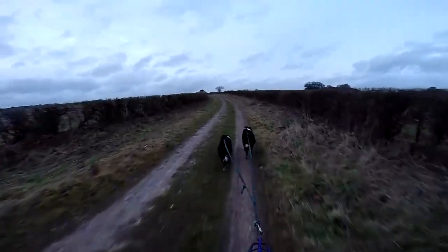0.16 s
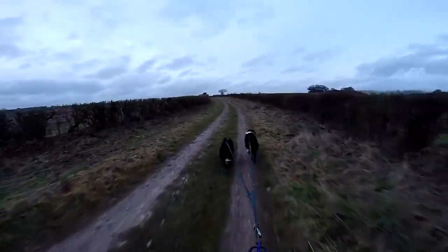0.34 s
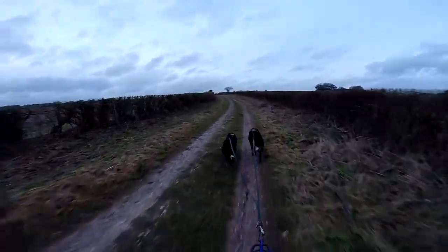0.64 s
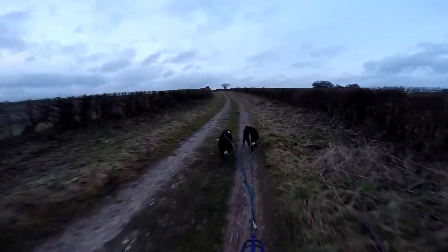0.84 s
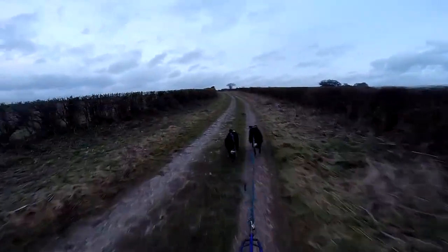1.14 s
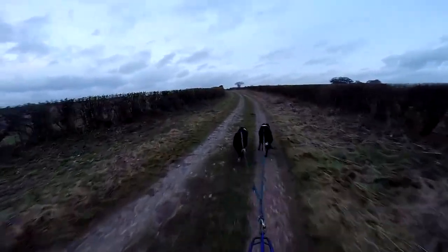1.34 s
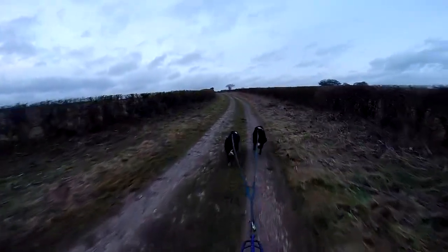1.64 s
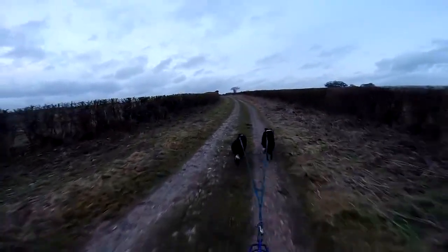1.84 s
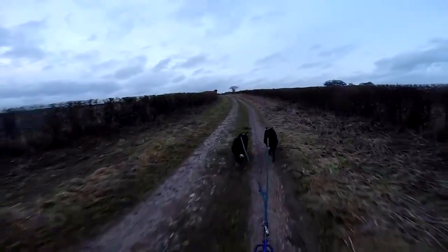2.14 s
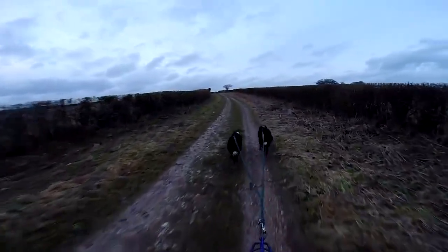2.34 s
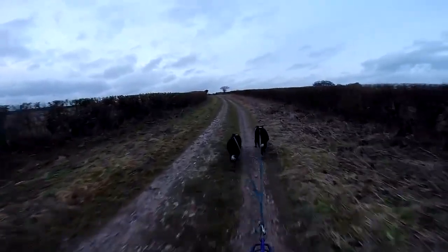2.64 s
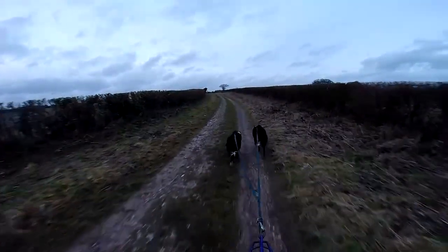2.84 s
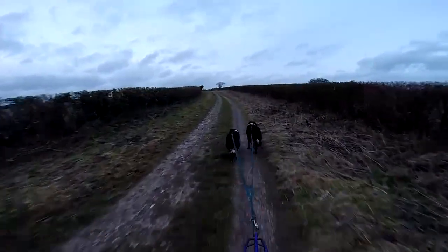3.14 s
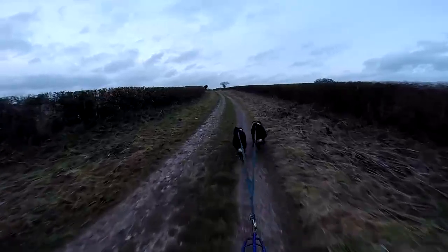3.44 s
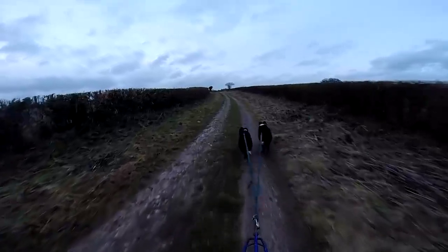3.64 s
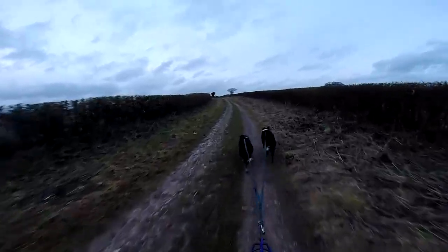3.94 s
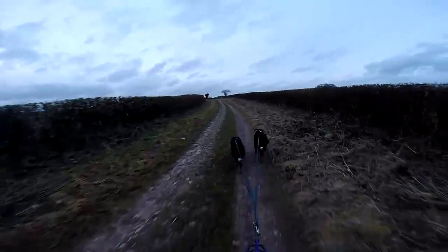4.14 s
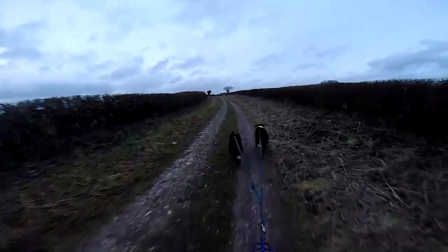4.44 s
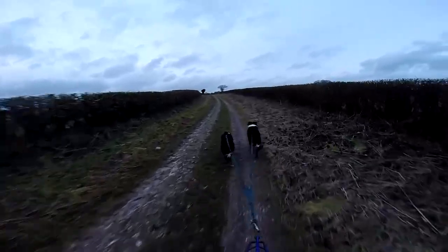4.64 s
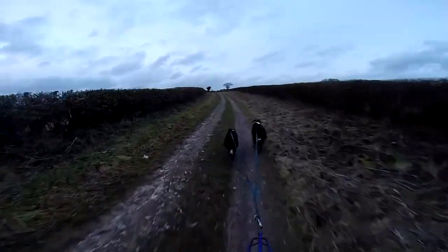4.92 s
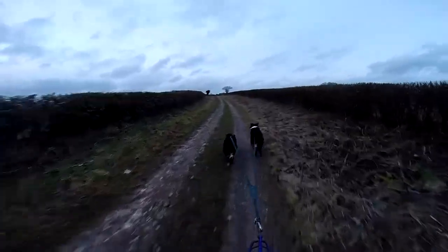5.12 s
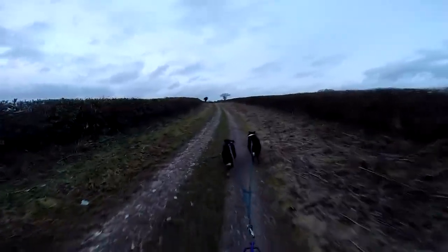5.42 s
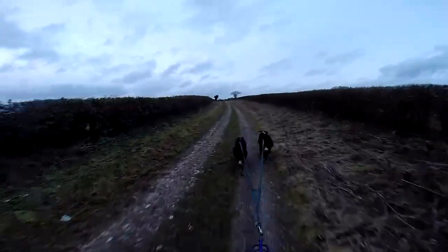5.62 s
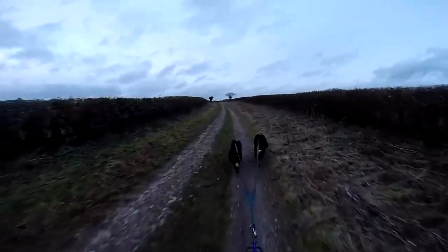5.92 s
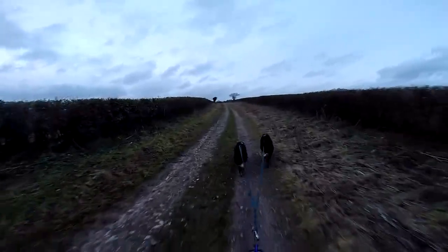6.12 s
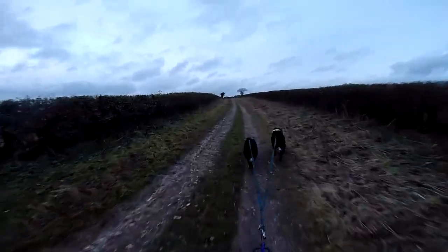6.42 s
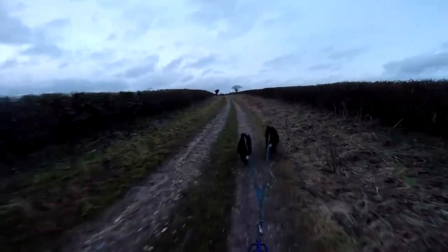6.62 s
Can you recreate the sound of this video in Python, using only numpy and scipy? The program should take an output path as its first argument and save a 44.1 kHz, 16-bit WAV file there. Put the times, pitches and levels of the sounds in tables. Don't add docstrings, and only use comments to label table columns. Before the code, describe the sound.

Muffled, close crackle of grit and pebbles under rolling wheels outdoors, with sharp stone snaps, dull bumps and constant boomy wind and road rumble.

```python
import sys
import numpy as np
from scipy import signal
from scipy.io import wavfile
from scipy.ndimage import uniform_filter1d

SR = 44100
rng = np.random.default_rng(int(sys.argv[2]) if len(sys.argv) > 2 else 0)


def bounce(signal):
    frames = np.transpose(np.atleast_2d(signal))
    limited = np.clip(frames, -1, 1)
    pcm = np.round(limited * 32767).astype(np.int16)
    wavfile.write(sys.argv[1], SR, pcm)


def rack_gain(trim_db):
    fader = np.asarray(trim_db, float)
    return 10 ** (fader / 20)


N = 298557


def rms_one(x):
    return x / np.sqrt(np.mean(x ** 2) + 1e-20)


def curve(rows):
    s, level_db = np.transpose(rows)
    return np.interp(np.arange(N) / SR, s, level_db)


def swells(rows, rest_db):
    edge_db = 11.5
    t = np.arange(0, N, 64) / SR
    power = rack_gain(rest_db) ** 2
    for s, top_db, half_s in rows:
        power = power + rack_gain(top_db - edge_db * np.abs(t - s) / max(half_s, .01)) ** 2
    return np.interp(np.arange(N) / SR, t, 10 * np.log10(power))


def drift(rate):
    r = np.exp(-80 * np.pi * rate / SR)
    slow = signal.lfilter([1], [1, -2 * r, r * r], rng.standard_normal(N // 40 + 2002))[2000:]
    return np.interp(np.arange(N) / 40, np.arange(len(slow)), rms_one(slow))


def resonance(x, hz, width_hz):
    r = np.exp(-np.pi * width_hz / SR)
    zeros = np.array([1, 0, -1]) * (1 - r * r) / 2
    return signal.lfilter(zeros, [1, -2 * r * np.cos(2 * np.pi * hz / SR), r * r], x)


def steep_resonance(x, hz, width_hz, second_width_hz):
    return resonance(resonance(x, hz, width_hz), hz, second_width_hz)


def coloured(spectrum, patchy_db, per_s):
    hz, level_db = np.transpose(spectrum)
    edges = hz[0] * 2 ** np.arange(0, np.log2(hz[-1] / hz[0]) + .4, .5)
    white, out = rng.standard_normal((2, N)), 0
    for k, (low, high) in enumerate(zip(edges, edges[1:])):
        band = signal.sosfilt(signal.butter(2, [low, high], "band", fs=SR, output="sos"), white[k % 2])
        centre_db = np.interp(np.log(low * high) / 2, np.log(hz), level_db)
        out = out + band * rack_gain(centre_db + patchy_db * drift(per_s))
    return rms_one(out)


def through_case(x):
    dull = signal.sosfilt(signal.butter(4, 6400, fs=SR, output="sos"), x)
    dull = dull - .55 * resonance(dull, 3660, 380)
    return dull - .55 * resonance(dull, 5020, 340)


def grains(modes, level_db, per_s, spread_db, clump_db, clumps_per_s, scatter_db):
    busy = rack_gain(.9 * (level_db - np.mean(level_db)))
    chance = per_s * busy * rack_gain(clump_db * drift(clumps_per_s)) / SR
    born = np.flatnonzero(rng.random(N) < chance)
    sizes = (rack_gain(spread_db * np.minimum(rng.exponential(1, N), 4)) / np.sqrt(busy))[born]
    out, luck = np.zeros(N), rng.standard_normal(N + 100)
    for k, (hz, width_hz, mode_db) in enumerate(modes):
        clicks = np.full(N, 1e-18)
        clicks[born] = sizes * rack_gain(scatter_db * luck[born + k]) * np.sign(luck[born + k + 50])
        out += rack_gain(mode_db) * steep_resonance(clicks, hz, width_hz, 2.5 * width_hz)
    return rack_gain(level_db) * rms_one(through_case(out))


def add(track, s, sound):
    i = round(s * SR)
    track[i:i + len(sound)] += sound[:N - i]


def ping(hz, rise_s, t60):
    t = np.arange(round(.08 * SR)) / SR
    wave = (1 - np.exp(-t / rise_s)) * rack_gain(-60 * t / t60) * np.sin(2 * np.pi * hz * t)
    return wave / np.abs(wave).max()


def whine():
    return rack_gain(-90) * rms_one(steep_resonance(rng.standard_normal(N), 8415, 70, 70))


# frequency in Hz, level in dB.
HISS_SPECTRUM = [(260, -29), (450, 0), (909, -2.5), (1610, -2.5), (2220, -4), (2420, -2.5), (3300, -6.5),
                 (4970, -13), (5500, -13.5), (10900, -23), (14900, -27.5)]


def hiss(rattle_db, grit_db, rolling):
    steady = coloured(HISS_SPECTRUM, patchy_db=.4, per_s=10)
    steady = steady + .9 * resonance(steady, 3250, 220)
    spray = .98 + 32 * rack_gain(rattle_db) + 37 * rack_gain(grit_db)
    puffs = 60 * uniform_filter1d(np.abs(rolling), size=400)
    return rack_gain(-61) * (spray + puffs) * steady


# top in seconds, level in dB, half-length in seconds.
MOUNT_JOLTS = [(0.0, -31.5, 0.022), (.3, -41.5, .04), (.51, -40.5, 0.15), (.9, -37.5, 0.11),
               (1.15, -29, 0.1), (1.34, -35, .05), (1.43, -35.5, 0.055), (1.58, -39, 0.089),
               (1.69, -40.5, 0.12), (2.05, -45.5, .1), (2.22, -34, 0.091), (2.65, -33, 0.11),
               (2.84, -42, 0.042), (2.98, -41.5, 0.041), (3.13, -38, 0.056), (3.31, -43.5, .1),
               (3.57, -39.5, 0.24), (4.07, -38, 0.068), (4.27, -40, 0.21), (4.62, -38.5, 0.11),
               (4.96, -39, .06), (5.08, -41, 0.17), (5.24, -40, 0.044), (5.45, -33, 0.094),
               (5.68, -37.5, .09), (5.79, -38.5, .06), (5.95, -33.5, 0.11), (6.16, -37.5, 0.074),
               (6.36, -35, 0.17), (6.66, -42.5, .08)]


def mount_level():
    return swells(MOUNT_JOLTS, rest_db=-51.5)


def wobble():
    hz = 24.5 * (1 + .1 * drift(12))
    swing = np.sqrt(2) * np.sin(2 * np.pi * np.cumsum(hz) / SR)
    buffet = rms_one(steep_resonance(rng.standard_normal(N), 22.3, 33.4, 33.4))
    return rack_gain(mount_level()) * (.78 * swing + .46 * buffet)


# frequency in Hz, density in dB per Hz.
RUMBLE_SPECTRUM = [(24, -59), (40, -5.5), (54, -5.5), (120, -11.5), (187, -19.5), (292, -17), (477, -32),
                   (700, -37.5), (910, -89), (1540, -120)]
# time in seconds, rumble level in dB at mean roughness.
WIND_LEVEL = [(0, -50), (.3, -53), (.8, -52.5), (1.35, -56), (1.9, -51.5), (2.25, -49), (2.8, -55),
              (3.5, -53.5), (4.2, -51.5), (4.64, -52), (4.72, -55), (5.13, -48.5), (5.45, -54), (5.71, -51),
              (6.2, -50.5), (6.6, -57), (6.77, -51)]


def rumble(rattle_db):
    road_db = .56 * (rattle_db - rattle_db.mean())
    flutter_db = 1.6 * drift(22)
    swing_db = .2 * (mount_level() + 43)
    level_db = curve(WIND_LEVEL) + road_db + flutter_db + swing_db
    return rack_gain(level_db) * coloured(RUMBLE_SPECTRUM, patchy_db=2.5, per_s=10.2)


# start in seconds, peak in dB, pitch in Hz.
CLIP_TICKS = [
    (2.6598, -61, 9800),
    (2.7386, -63.5, 9530),
    (4.2242, -64, 8870),
    (4.983, -65, 8850),
    (5.0249, -66, 9290),
    (6.3633, -60, 10900),
    (6.4422, -61, 9400),
]


def clip_ticks():
    out = np.zeros(N)
    for s, peak_db, hz in CLIP_TICKS:
        cluster = sum(ping(k * hz, .0006, .011) for k in (.87, .94, 1, 1.07, 1.15))
        add(out, s, rack_gain(peak_db) * cluster * .6)
    return out


# start in seconds, peak in dB, pitch in Hz.
ROOT_BUMPS = [(.37, -40, 140), (.485, -38, 125), (.94, -43, 320), (1.0, -42.5, 200), (0.784, -28.5, 87.4),
              (1.132, -46, 80), (3.57, -41, 89), (4.631, -36, 85), (4.887, -42, 209), (5.259, -43.5, 165),
              (5.389, -43, 265), (5.964, -41, 140)]


def root_bumps():
    out = np.zeros(N)
    for s, peak_db, hz in ROOT_BUMPS:
        add(out, s, rack_gain(peak_db) * ping(hz, .0043, 3.5 / hz))
    return out


# start in seconds, peak in dB, pitch in Hz.
FRAME_KNOCKS = [
    (0.342, -33, 1160),
    (0.524, -43.5, 1150),
    (0.56, -41, 1180),
    (3.83, -37.5, 1170),
    (5.431, -28, 1360),
    (5.534, -40, 1100),
    (6.035, -37.5, 1090),
    (6.367, -42, 1130),
]


def frame_knocks():
    out = np.zeros(N)
    for s, peak_db, hz in FRAME_KNOCKS:
        knock = ping(hz, .00076, .0088) + .4 * ping(1.4 * hz, .00047, .0069)
        add(out, s, rack_gain(peak_db - 3.5) * knock)
    return out


# time in seconds, rattle level in dB.
GROUND_ROUGHNESS = [(0, -57.5), (.27, -56.5), (.35, -42), (.44, -54.5), (.7, -47), (1.07, -64),
                    (1.4, -62.5), (1.75, -59.5), (2.41, -72.5), (2.83, -58.5), (3.2, -67), (3.5, -63.5),
                    (3.7, -65.5), (4.6, -62), (5.1, -65), (5.7, -61.5), (6.0, -58), (6.77, -59.5)]
# frequency in Hz, width in Hz, level in dB.
FRAME_MODES = [(135, 138, 4.5), (302, 160, 1), (352, 130, -14), (1146, 150, 3.5), (1608, 290, 7.5),
               (1890, 310, 6), (2410, 330, 4.5), (3700, 380, 0), (5320, 790, -4.5), (7800, 400, -8.5)]


def frame_rattle(rattle_db):
    return grains(FRAME_MODES, rattle_db, 1200, spread_db=3.6, clump_db=2.5, clumps_per_s=40, scatter_db=3.5)


# middle in seconds, level in dB, half-length in seconds.
GRIT_PATCHES = [(0.0, -57.5, 0.16), (.35, -55, 0.068), (.62, -60.5, 0.23), (.86, -55, .14),
                (1.12, -56.5, 0.059), (1.3, -47.5, .1), (1.41, -53, 0.12), (1.54, -53.5, .12),
                (1.82, -55, 0.089), (1.98, -61, .08), (2.27, -56.5, 0.34), (2.58, -50, 0.1),
                (2.77, -52.5, .16), (3.05, -56.5, 0.28), (3.28, -54, 0.28), (3.52, -50.5, 0.077),
                (3.67, -57, 0.064), (3.85, -52.5, 0.1), (4.06, -55.5, 0.12), (4.19, -54, 0.19),
                (4.44, -50, 0.089), (4.56, -54, .2), (5.12, -57, .08), (5.61, -51, 0.044),
                (5.73, -55, 0.066), (6.02, -52.5, .15), (6.22, -49, .07), (6.38, -52, 0.11),
                (6.53, -54.5, 0.054), (6.68, -55, .2)]
# frequency in Hz, width in Hz, level in dB.
CASE_MODES = [(1850, 52, -9), (2090, 62, 0), (2480, 320, 1.5), (2730, 380, -4.5), (3250, 224, 3),
              (3760, 260, -4), (4420, 340, -9), (5630, 900, -15.5)]


def grit_crackle(grit_db):
    return grains(CASE_MODES, grit_db, 520, spread_db=4, clump_db=5.5, clumps_per_s=30, scatter_db=3)


# start in seconds, length in seconds, level in dB.
TYRE_SKIDS = [(-.012, 0.023, -43.5), (.63, 0.36, -63), (1.193, .25, -62), (0.335, 0.061, -45),
              (0.563, 0.033, -45), (4.663, 0.045, -65), (5.084, 0.07, -54), (5.592, 0.042, -52),
              (5.679, 0.084, -53), (5.853, 0.042, -52), (6.048, 0.074, -57.5), (3.447, 0.12, -60.5)]


def scrapes():
    t, stroke = np.arange(N) / SR, np.zeros(N)
    for s, length_s, level_db in TYRE_SKIDS:
        stroke += rack_gain(level_db) * np.sin(np.pi * np.clip((t - s) / length_s, 0, 1)) ** .41
    modes = FRAME_MODES[3:] + CASE_MODES[3:]
    return stroke * grains(modes, 0, 2200, spread_db=4.5, clump_db=1, clumps_per_s=89, scatter_db=4.5)


# start in seconds, peak in dB, pitch in Hz.
LARGE_STONES = [(0.3206, -26.5, 2480), (0.3472, -34, 1930), (0.5666, -34, 2100), (0.624, -34, 1940),
                (0.843, -25.5, 3080), (1.0263, -31.5, 2600), (1.2096, -34.5, 3250), (1.2418, -37, 2550),
                (1.4402, -27, 2480), (1.5283, -35.5, 3370), (3.1506, -35, 2950), (3.243, -37.5, 2850),
                (3.2705, -39, 2900), (3.2735, -22.5, 2610), (3.7444, -36, 2700), (3.819, -31, 3500),
                (3.8313, -31, 2090), (4.151, -33.5, 2850), (4.1703, -33, 1850), (4.2022, -35, 2560),
                (4.5815, -34.5, 2680), (5.3827, -28, 2480), (5.4296, -18.5, 2390), (5.5454, -37, 2580),
                (5.7516, -34, 2720), (6.1787, -38, 2430), (6.3654, -35, 2560), (6.642, -30, 3220)]
# start in seconds, peak in dB, pitch in Hz.
SMALL_PEBBLES = [(.2894, -47, 1550), (.895, -37, 3250), (1.1432, -37, 3250), (1.2573, -39, 2450),
                 (1.2808, -43, 2400), (1.3269, -36, 2550), (2.246, -36.5, 3130), (2.5592, -38, 2970),
                 (2.734, -36, 3300), (2.8982, -36.5, 2540), (2.9591, -38.5, 2480), (3.007, -41, 3400),
                 (3.3024, -38.5, 3170), (3.6509, -36.5, 3300), (3.8905, -38, 2620), (3.933, -37, 3300),
                 (3.9624, -38, 2570), (4.0906, -37, 3140), (4.3091, -39, 2540), (4.4857, -41.5, 1850),
                 (5.2872, -37.5, 2620), (5.311, -37, 2800), (5.4017, -40, 3100), (5.5216, -40, 3180),
                 (5.89, -45, 1850), (5.928, -37.5, 3220), (6.325, -39, 2510), (6.6258, -42, 3250)]
# start in seconds, peak in dB, pitch in Hz.
METAL_CHIPS = [(.271, -40.5, 2120), (.4793, -38, 1860), (.4905, -35.5, 2530), (1.1882, -37, 2360),
               (1.731, -40, 2360), (1.7441, -37.5, 3380), (2.1458, -38, 3400), (4.6877, -39.5, 1970),
               (5.086, -38, 2070), (5.9645, -36.5, 1960), (6.0398, -36.5, 3260), (6.0596, -40, 2170),
               (6.2005, -29.5, 1890), (6.251, -40, 1710)]


def stones():
    kinds = (LARGE_STONES, -35), (SMALL_PEBBLES, -29), (METAL_CHIPS, -15.5)
    hits = [(*row, treble_db) for rows, treble_db in kinds for row in rows]
    body, edge, ragged = np.zeros(N), np.zeros(N), rng.standard_normal((len(hits), 1200))
    t = np.arange(1200) / SR
    fade = np.minimum(t / .0015, 1) ** 2 * rack_gain(-60 * t / .027)
    for (s, peak_db, hz, treble_db), noise in zip(hits, ragged):
        snap = ping(hz, .00024, .0037) + .35 * ping(3110, .00025, .0033) + .35 * ping(1940, .0001, .0021)
        add(body, s, rack_gain(peak_db - 1.5) * snap)
        thin = ping(5480, .00047, .0047) + .4 * ping(4500, .00046, .005) + .25 * ping(7380, .0007, .006)
        add(edge, s, rack_gain(peak_db + treble_db + 5) * thin)
        ring = 0
        for mode_hz, width_hz, mode_db in CASE_MODES[:5] + FRAME_MODES[4:6]:
            tilt_db = 8.7 * max(np.log2(mode_hz / hz), 0)
            ring = ring + rack_gain(mode_db - tilt_db) * resonance(noise * fade, mode_hz, .6 * width_hz)
        add(body, s, rack_gain(peak_db - 12.5) * ring / np.abs(ring).max())
        dark_db = 50 * min(np.log2(hz / 2660), 0)
        add(edge, s + .0004, rack_gain(peak_db - 21 + dark_db) * ping(4400, .0003, .005))
        add(body, s + .001606, rack_gain(peak_db - 9.5) * ping(.86 * hz, .00025, .0046))
    return signal.sosfilt(signal.butter(6, [1050, 3500], "band", fs=SR, output="sos"), body) + edge


def scene():
    rattle_db = curve(GROUND_ROUGHNESS) - 2.5
    grit_db = swells(GRIT_PATCHES, rest_db=-65) - 1.5
    rolling = frame_rattle(rattle_db) + grit_crackle(grit_db) + scrapes() + stones()
    rolling = rolling + clip_ticks() + frame_knocks() + root_bumps()
    background = whine() + hiss(rattle_db, grit_db, rolling) + wobble() + rumble(rattle_db)
    return (background + rolling)[None]


def thin_treble(x):
    edge_hz, top_hz = 12800, 15050
    hz, _, cells = signal.stft(x, SR, "cosine", nperseg=1024)
    snap = np.abs(cells[0, (hz > 1000) & (hz < 4000)]).sum(axis=0)
    jumps = np.append(snap[2:] > 2.4 * snap[:-2], [False, False])
    near_click = uniform_filter1d(jumps * 1., size=3) > .1
    draws = rng.random((len(hz) // 3 + 1, len(snap) // 2 + 1))
    draws = np.repeat(np.repeat(draws, 3, axis=0), 2, axis=1)
    chance = np.interp(hz, [edge_hz - 300, edge_hz, 14300, top_hz, top_hz + 50], [1, .62, .5, .28, 0])
    kept = draws[:len(hz), :len(snap)] < chance[:, None]
    kept[hz > edge_hz] &= ~near_click
    return signal.istft(cells * kept, SR, "cosine", nperseg=1024)[1][:, :N]


def band_limit(x):
    return signal.sosfilt(signal.butter(12, 15040, fs=SR, output="sos"), x)


def record(dry):
    miked = signal.sosfilt(signal.butter(2, 8, "high", fs=SR, output="sos"), dry)
    mix = thin_treble(miked)
    return band_limit(mix)


dry = scene()
out = record(dry)
bounce(out)
```